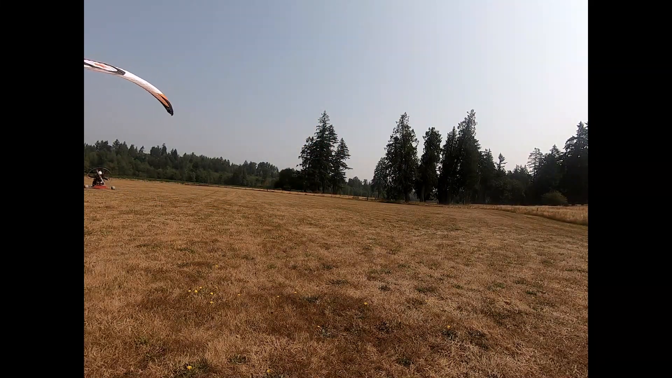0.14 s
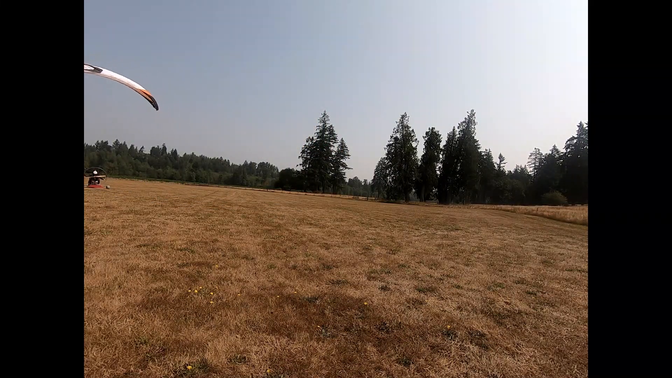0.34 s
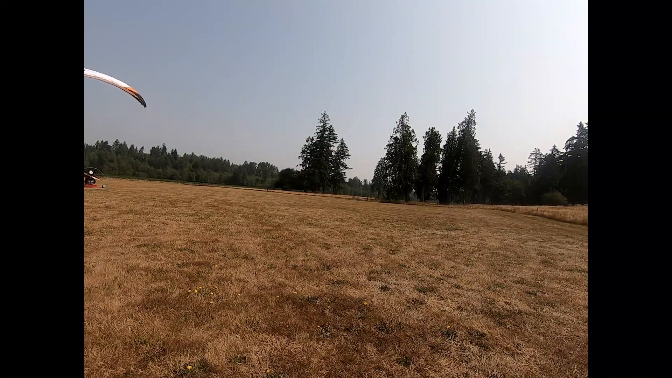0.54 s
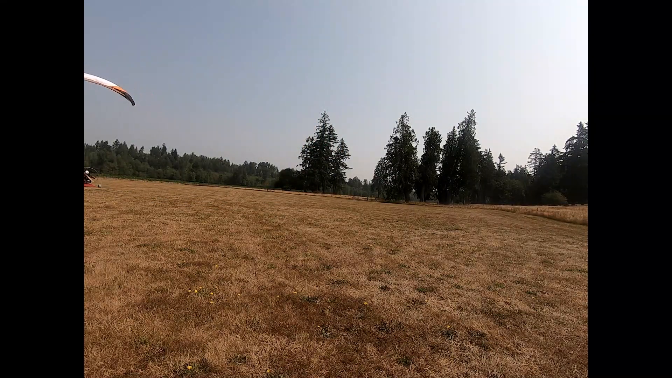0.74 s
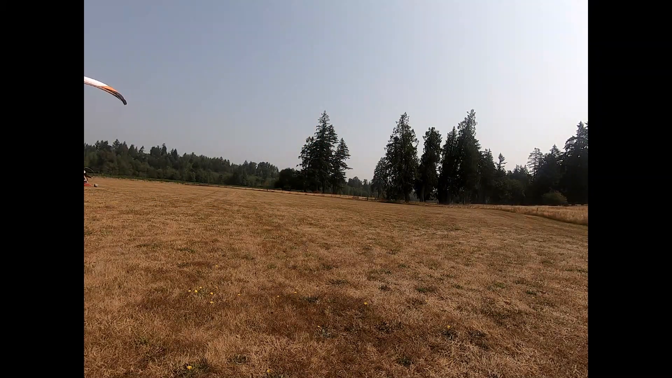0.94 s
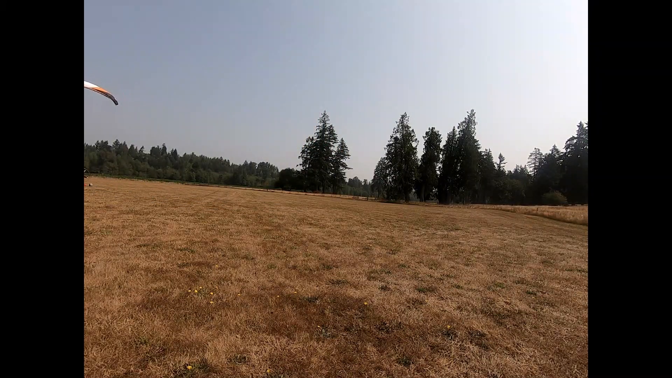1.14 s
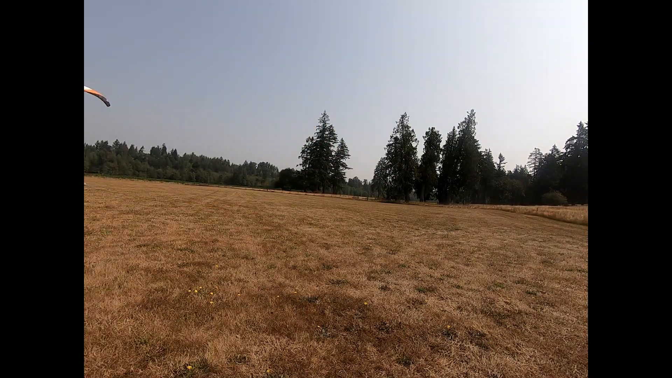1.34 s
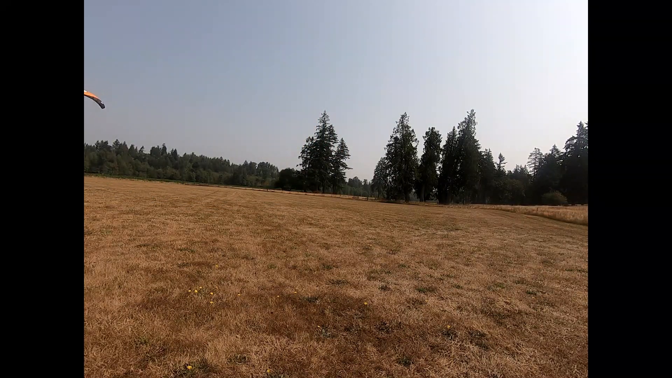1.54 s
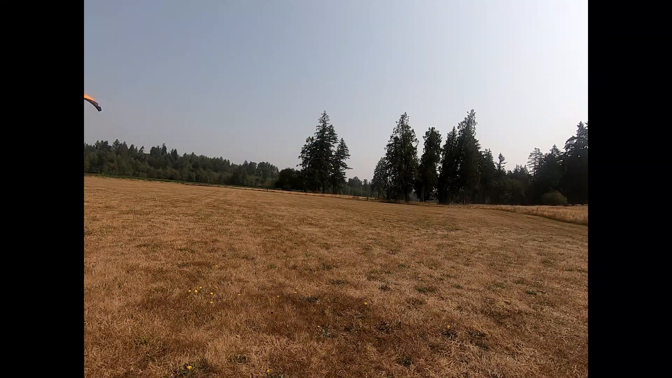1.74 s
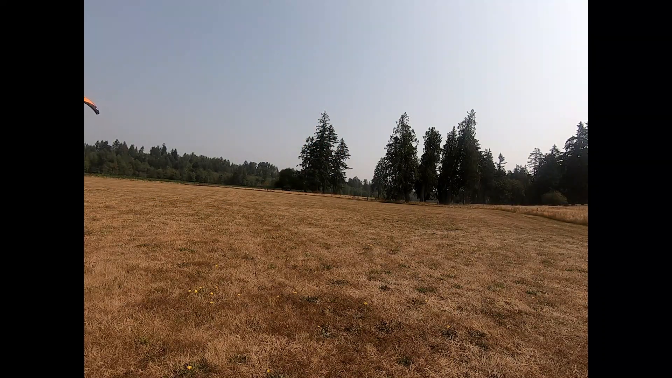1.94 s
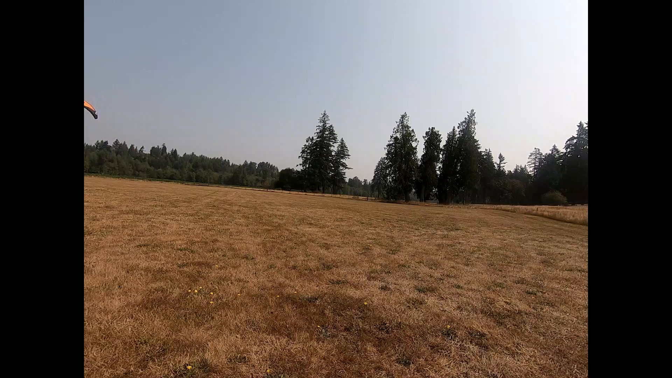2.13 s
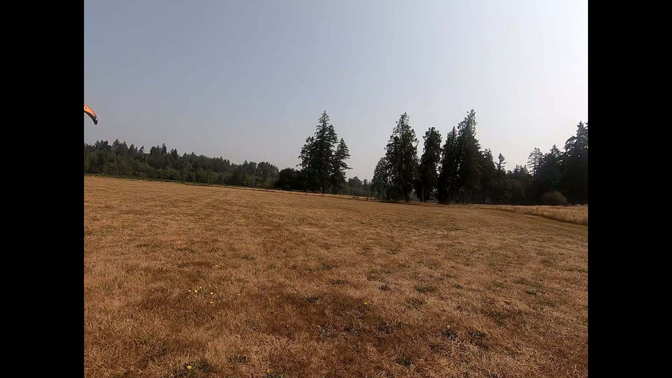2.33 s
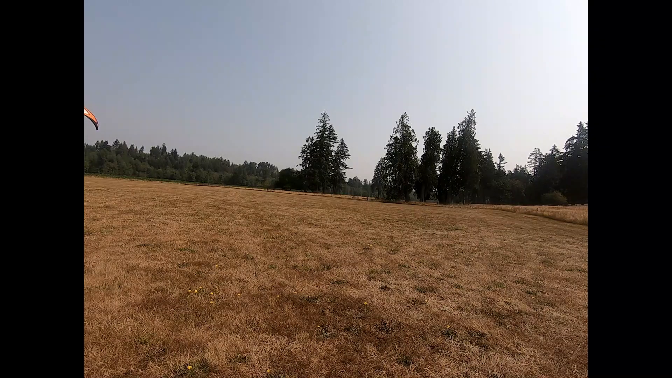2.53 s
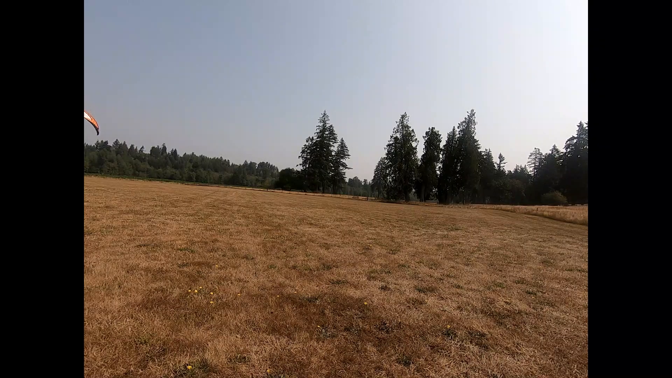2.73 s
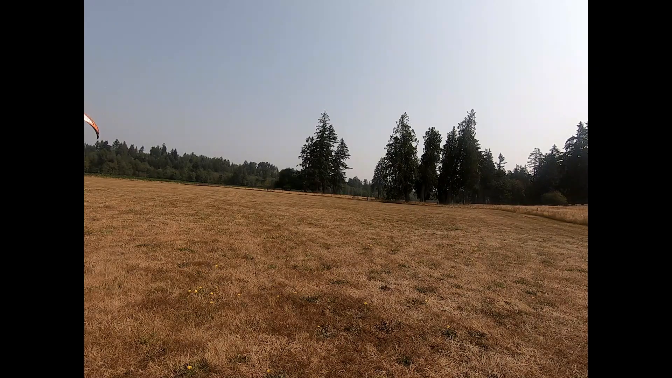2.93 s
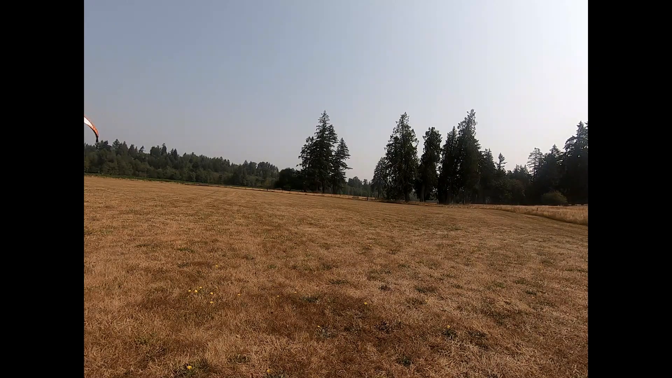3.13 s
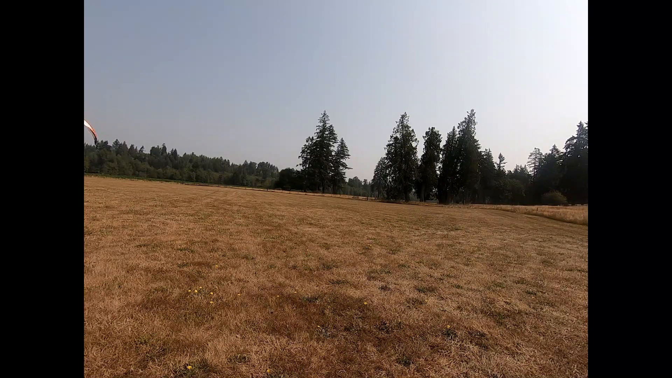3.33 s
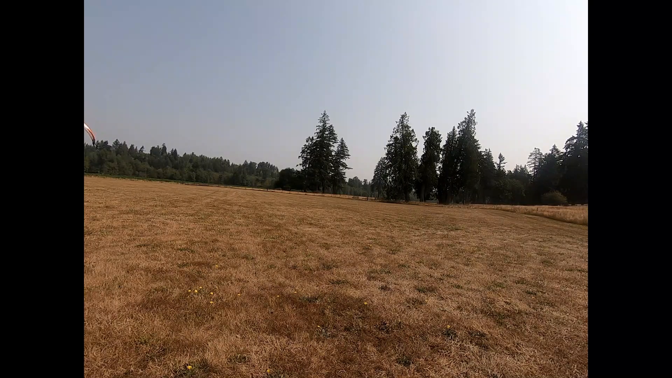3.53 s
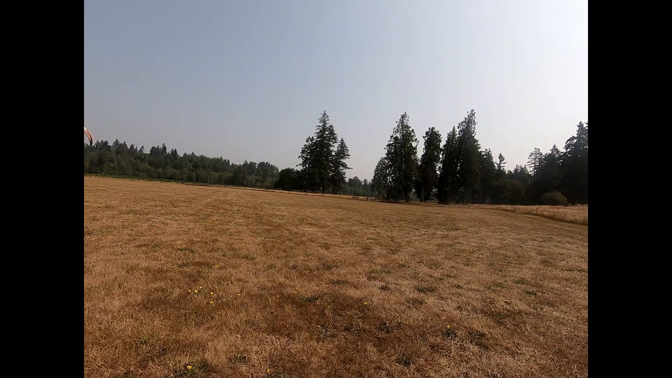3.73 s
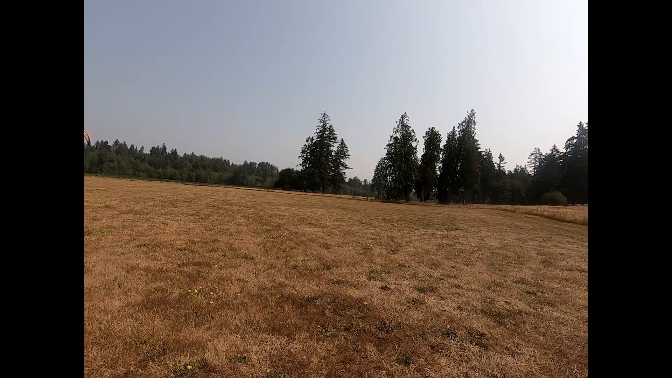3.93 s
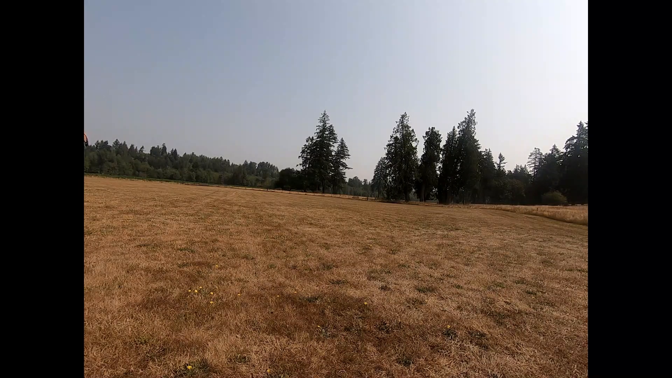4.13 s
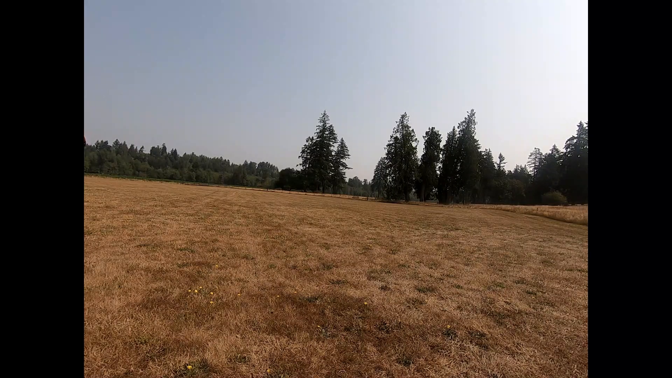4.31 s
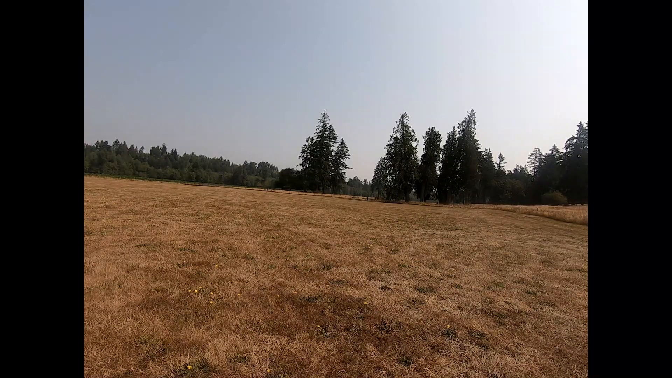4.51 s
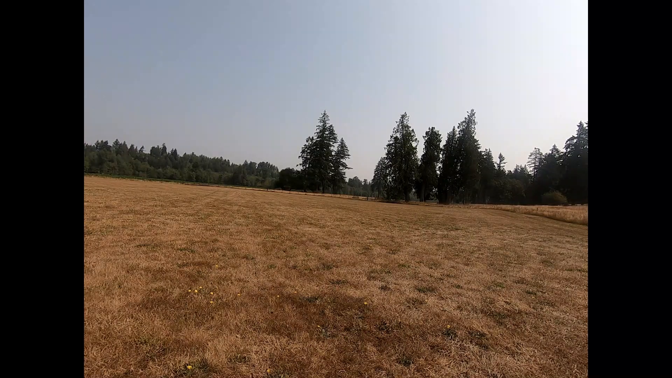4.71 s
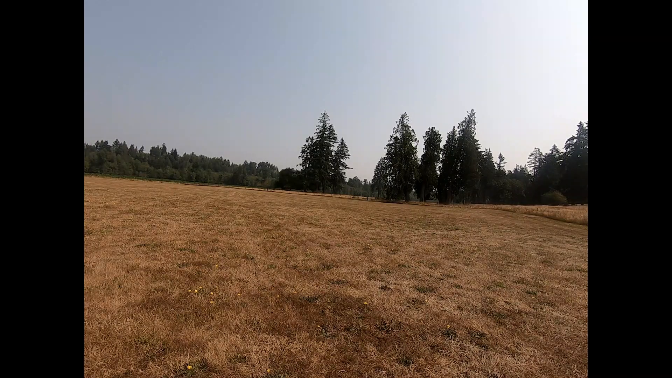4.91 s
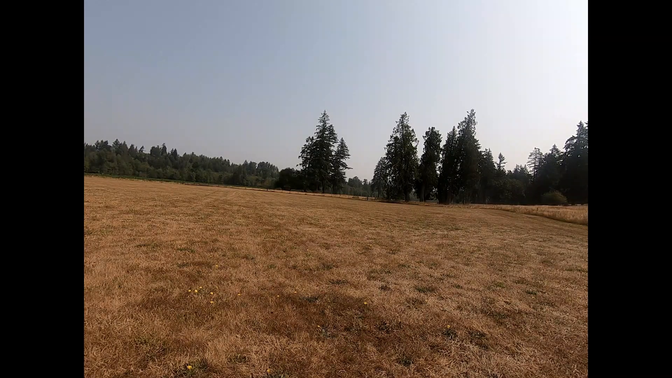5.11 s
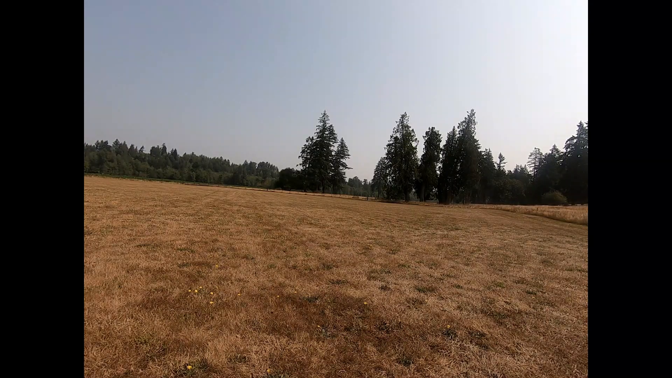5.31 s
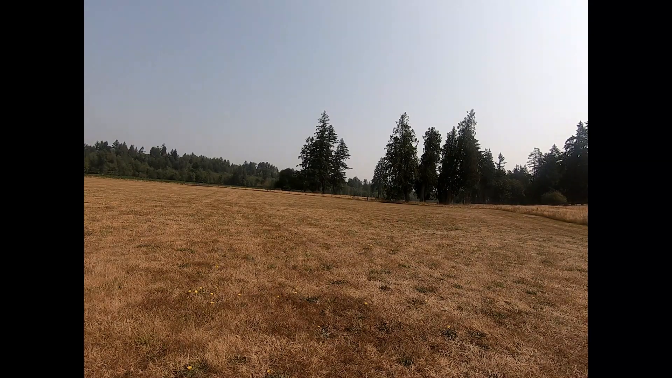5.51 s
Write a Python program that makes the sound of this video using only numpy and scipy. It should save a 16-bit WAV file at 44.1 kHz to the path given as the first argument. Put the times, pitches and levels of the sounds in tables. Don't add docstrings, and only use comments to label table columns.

```python
import sys
import numpy as np
from scipy import signal
from scipy.fft import rfft, irfft, next_fast_len
from scipy.io import wavfile
from scipy.ndimage import uniform_filter1d, map_coordinates

SR = 44100
rng = np.random.default_rng(int(sys.argv[2]) if len(sys.argv) > 2 else 0)


def field_ratio(decibels):
    return 10 ** (np.asarray(decibels, dtype=float) / 20)


def file_out(sig):
    cols = np.atleast_2d(sig).T
    lim = np.clip(cols, -1, 1)
    pcm = np.round(lim * 32767).astype(np.int16)
    wavfile.write(sys.argv[1], SR, pcm)


N = 245186

# (frequency [Hz], density [dB per Hz])
FIELD_SPECTRUM = [(20, -16.5), (60, 0.5), (300, -29), (700, -31), (1500, -38), (3000, -40), (6000, -68),
                  (9000, -77), (15500, -110)]
# (frequency [Hz], density [dB per Hz])
WAKE_SPECTRUM = [(20, -19), (45, -6.5), (80, 6), (150, -3), (250, -11), (400, -21.5), (700, -37.5),
                 (1200, -52), (3000, -97.5)]
# (frequency [Hz], density [dB per Hz])
HISS_SPECTRUM = [(250, -9.5), (500, -5), (1000, -1.5), (1550, -5), (2200, -7.5), (3600, -8.5),
                 (4130, -12.5), (5000, -13.5), (6000, -9.5), (7100, -9.5), (7700, -16.5), (10800, -29),
                 (14000, -35), (15400, -56.5)]
# (multiple of blade rate [-], level [dB])
COMB_SHAPE = [(5, -5), (7, 0), (8, -3), (10, -1), (12, 0), (16, -2), (20, -6), (26, -10), (32, -18)]
# (level [dB], gain per doubling of speed [dB], share of the rush's swing [-],
# change after the cut [dB], loss with throttle shut [dB])
BLADE_LINES = [
    (-18, 19, .15, -8.5, 2),
    (-26.5, 8.5, 0.5, -8, -2),
    (-48, 6.5, -0.34, 5, 5),
]
# (frequency [Hz], level of a line [dB])
PIPE_RESPONSE = [(55, -25), (90, -27.5), (140, -26.5), (200, -35), (250, -41.5), (350, -51.5), (420, -55.5)]
FIRING_SHUT_LOSS_DB = [9.5, 12, 14]
FIRING_CUT_DB = [2, -12, -5.5]
# (time [s], peak [dB])
POPS = [(2.081, -19), (2.125, -17), (2.203, -15), (2.287, -13), (2.39, -14), (2.476, -13), (2.552, -16),
        (2.615, -22), (2.68, -16), (2.746, -15), (2.815, -19), (2.865, -18), (4.35, -17), (5.44, -20)]
# (time [s], length [s], peak [dB])
RATTLE_BURSTS = [(2.498, .01, -52), (2.542, .03, -49), (2.6231, .01, -36), (2.7404, .075, -39),
                 (2.833, .01, -54), (2.8553, .05, -38), (2.989, .01, -38), (3.003, .04, -50.5),
                 (3.0856, .03, -35), (3.112, .025, -34.5), (3.1423, .08, -35.5), (3.2757, .045, -35),
                 (3.3561, .075, -39), (3.445, .03, -48), (5.24, .01, -44), (5.344, .01, -50)]
# (time [s], blade passes [Hz], firings [Hz])
SPEEDS = [
    [(0, 72.4, 100.1), (.3, 84.23, 119), (.42, 87.33, 121.2), (1.13, 88.8, 123.2), (1.37, 82.3, 110.5),
     (1.6, 78.3, 108.5), (1.9, 87.97, 119.7), (2.2, 64.27, 86.47), (2.38, 54, 72.6), (2.66, 43.87, 61.1),
     (2.95, 45, 60.96), (3.2, 51.84, 75.82), (3.39, 65.07, 90.56), (3.73, 77.7, 107.8), (4.04, 81.1, 110.2),
     (4.25, 79.05, 105.9), (5.03, 59.77, 83.1), (5.49, 52, 71.34)],
    [(5.5, 94, 110)],
]
# (time [s], throttle [0-1])
THROTTLE = [(0, 1), (.3, 1), (1.1, 0.9), (1.17, 0.2), (1.5, 0.4), (1.9, 0.7), (2.1, 0.09), (2.7, 0),
            (3.1, 0.86), (3.4, .9), (3.7, 0.86), (4.3, 0.47), (4.6, 0.43), (5.4, 0.3), (5.49, 0.3),
            (5.5, 0.8)]
# (time [s], rush of air heard [dB], facing [0 turned away - 1 blowing this way])
PATH = [(0, -39.5, 0.59), (.15, -38.5, 0.57), (.3, -44, 0.96), (.9, -49.5, 1), (1.05, -47.5, 0.52),
        (1.35, -49.5, 0.33), (1.65, -50, 0.29), (1.95, -47.5, 0.14), (2.25, -50.5, 0.036),
        (2.65, -55.5, 0.06), (3.05, -56.5, .2), (3.25, -55, 0.17), (3.85, -53, 0.1), (4.05, -54.5, 0.34),
        (4.65, -56, 0.28), (4.85, -54.5, 0.0088), (5.49, -58.5, .01), (5.5, -48.5, 0.13)]
# (frequency [Hz], left minus right [dB])
PORT_DIFFERENCE = [(90, -.8), (200, -5), (480, -14), (620, -8), (900, 1), (1500, 8), (2200, 10), (2700, 15),
                   (3400, 9), (4000, 10), (4400, 3), (5900, -11), (7700, 1), (10500, -3)]
# (frequency [Hz], left leads by [rad])
PORT_LEAD = [(30, -.4), (250, -.5), (400, -.2), (600, 2.1), (2300, 1.7), (3100, .2), (3900, 1.0),
             (4300, .2), (5200, .5), (6000, 2.0), (7000, 3.0), (12000, 2.8)]
# (left [dB], right [dB])
CUT_STEP_DB = (-31, -22)

CUT_S = 5.4962
FULL_HZ, NEAR_DB = 87, -42


def in_time(table):
    s, *columns = np.transpose(table)
    return [np.interp(np.arange(N) / SR, s, column) for column in columns]


def at_hz(points, hz):
    points_hz, values = np.transpose(points)
    return np.interp(np.log(hz + 1), np.log(points_hz), values)


def drift(rate_hz):
    knots, coarse = rng.standard_normal(400), np.arange(0, N + 32, 32)
    position = 3 + coarse / SR * np.clip(rate_hz, .1, 60)
    return np.interp(np.arange(N), coarse, map_coordinates(knots, [position], order=3))


def coloured(spectrum, channels=1):
    hz = np.arange(N // 2 + 1) * SR / N
    white = rng.standard_normal((channels, N))
    noise = irfft(rfft(white) * field_ratio(at_hz(spectrum, hz)), N)
    return noise / np.sqrt(np.mean(noise ** 2) + 1e-20)


def lowpass(x, order, hz):
    return signal.sosfilt(signal.butter(order, hz, fs=SR, output="sos"), x)


def smooth(x, tau_s, start=0):
    keep = np.exp(-1 / (tau_s * SR))
    return signal.lfilter([1 - keep], [1, -keep], x, zi=[start * keep])[0]


def ring(s, size, hz, t60_s):
    start = int(s * SR)
    t = np.arange(min(int(.08 * SR), N - start)) / SR
    return slice(start, start + len(t)), size * np.sin(2 * np.pi * hz * t) * field_ratio(-60 * t / t60_s)


def after_cut():
    return np.arange(N) >= CUT_S * SR


def speeds():
    inertia_s = .09
    before = uniform_filter1d(in_time(SPEEDS[0]), size=int(inertia_s * SR), mode="nearest")
    return np.where(after_cut(), in_time(SPEEDS[1]), before)


def shut():
    return 1 - np.clip(in_time(THROTTLE)[0], 0, 1)


def surge():
    octaves = np.log2(in_time(SPEEDS[0])[0])
    rise = np.clip(np.gradient(octaves) * SR, 0, None)
    return smooth(rise, tau_s=.53, start=rise[0])


def follows(db, per_octave_db, share, cut_db=0, shut_db=0):
    db = db + cut_db * after_cut() - shut_db * shut()
    db = db + per_octave_db * np.log2(speeds()[0] / FULL_HZ)
    return db + share * (in_time(PATH)[0] - NEAR_DB)


def ports(x, share=1):
    pad = 2048
    x = np.pad(np.atleast_2d(x), ((0, 0), (pad, pad)), "reflect", reflect_type="odd")
    size = next_fast_len(x.shape[1])
    hz = np.arange(size // 2 + 1) * SR / size
    half = field_ratio(share * at_hz(PORT_DIFFERENCE, hz) / 2) * np.exp(.5j * at_hz(PORT_LEAD, hz))
    return irfft(rfft(x, size) * np.array([half, 1 / half]), size)[:, pad:N + pad]


def field():
    left, right, both = coloured(FIELD_SPECTRUM, channels=3) * field_ratio(-39.5 + 1.9 * drift(0.37))
    return np.array([left, right]) + 1.2 * lowpass(both, 2, 200)


def knocks():
    knock_hz, pitch_spread = 6550, 0.06
    loss_db, spread_db = 2.5, 5.5
    period_s = 1 / speeds()[1]
    rows = []
    for s, length_s, db in RATTLE_BURSTS:
        gap_s = period_s[int(s * SR)]
        for k, (size, pitch) in enumerate(rng.standard_normal((8, 2))):
            if k * gap_s < length_s:
                peak_db = db - loss_db * k + spread_db * size * (k > 0)
                rows.append((s + k * gap_s, peak_db, knock_hz * (1 + pitch_spread * pitch)))
    return rows


def rattle():
    out = np.zeros(N)
    for s, db, hz in knocks():
        for k, (late, size, detune) in enumerate(rng.random((6, 3))):
            pitch_hz = hz * (.85 + 0.34 * detune) if k else hz
            tick_amp = (0.21 + .5 * size) * field_ratio(db - 3.1 * k)
            where, tick = ring(s + 0.0036 * k * late, tick_amp, pitch_hz, t60_s=.006)
            out[where] += tick
    out += 1.9 * smooth(np.abs(out), tau_s=.022) * rng.standard_normal(N)
    return signal.sosfilt(signal.butter(2, [4300, 7400], "band", fs=SR, output="sos"), out)


def engine(turn):
    even, uneven = .12, .55
    hz = speeds()[1]
    cycles = np.cumsum(hz) / SR
    phase = 2 * np.pi * cycles
    chance = map_coordinates(rng.standard_normal(800), [cycles + 2], order=3)
    strength = 1 + (even + uneven * shut() ** 2) * chance
    lines_db = []
    for k, (loss_db, cut_db) in enumerate(zip(FIRING_SHUT_LOSS_DB, FIRING_CUT_DB), 1):
        lines_db.append(at_hz(PIPE_RESPONSE, k * hz) - loss_db * shut() + cut_db * after_cut())
    thud = sum(field_ratio(db) * np.cos(k * phase) for k, db in enumerate(lines_db, 1))
    thud += field_ratio(lines_db[2] - 16) * np.cos(4 * phase)
    thud += field_ratio(lines_db[0] - 19) * np.cos(phase + turn)
    out = -np.sqrt(2) * strength * thud
    for s, db in POPS:
        where, pulse = ring(s - .0032, -field_ratio(db), hz=90, t60_s=.055)
        out[where] += pulse * np.minimum(np.arange(len(pulse)) / (.0025 * SR), 1)
    return out


def blade_air(turn):
    hiss_db, facing = in_time(PATH)
    rasp_db = -10.5 + 14 * facing
    sizzle_db = -12.5 + 16.5 * facing
    hiss = coloured(HISS_SPECTRUM, channels=3)
    below_1500, below_2600, below_4000 = [
        signal.sosfiltfilt(signal.butter(3, hz, fs=SR, output="sos"), hiss) for hz in (1500, 2600, 4000)]

    surging = surge()
    roar = (below_2600 - below_1500) * field_ratio(7.5 * surging - 1)
    rasp = (below_4000 - below_2600) * field_ratio(-5 * surging)
    bands = below_1500 * field_ratio(.7 * drift(8))
    bands += (rasp + roar) * field_ratio(rasp_db + 1.5 + .7 * drift(9))
    bands += (hiss - below_4000) * field_ratio(sizzle_db + 4 + .8 * drift(11))

    wobble = turn + .3 * drift(40)
    chop_db = 3.9 * np.cos(wobble - 1.0) + 2.1 * np.cos(2 * wobble - 1.6) + .5 * drift(55)
    scatter = field_ratio(follows(-7, 0, -.75))
    total = np.hypot(1, scatter)
    bands *= field_ratio(chop_db / total * np.array([[1], [.4], [.4]]))
    bands *= np.array([np.ones(N), scatter, scatter]) / total
    bands *= field_ratio(hiss_db + 1)
    wake_db = follows(-35, 0, 0.083) + 1.6 * drift(10)
    bands[0] += field_ratio(wake_db) * coloured(WAKE_SPECTRUM)[0]
    return bands


def propeller(turn):
    first_db, second_db, third_db = [follows(*line) for line in BLADE_LINES]
    hum = field_ratio(first_db) * np.cos(turn)
    hum += field_ratio(second_db) * np.cos(2 * turn - .6)
    hum += field_ratio(third_db) * np.cos(3 * turn - 1.5)
    hum += field_ratio(second_db - 22 + 2 * drift(4.9)) * np.cos(4 * turn - 2.5)

    rush_db, facing = in_time(PATH)
    comb_db = follows(-51.3, 20, .7, cut_db=-4)
    comb_db += 1.6 * np.minimum(rush_db + 49, 0)
    fall_db = 1.2 * (1 - np.clip(facing, 0, 1))
    for k in range(5, 33):
        level_db = comb_db - fall_db * max(k - 12, .6 * (12 - k))
        level_db += np.interp(k, *np.transpose(COMB_SHAPE)) + 3.2 * drift(6)
        hum += field_ratio(level_db) * np.cos(k * turn - .05 * k * k + .028 * k * drift(14))
    return np.sqrt(2) * hum


def scene():
    turn = 2 * np.pi * np.cumsum(speeds()[0]) / SR
    direct, *scattered = blade_air(turn)
    machine = rattle() + engine(turn) + direct + propeller(turn)
    return field() + ports(scattered, share=.3) + ports(machine)


def roll_off(x):
    return signal.sosfilt(signal.butter(12, 15050, fs=SR, output="sos"), x)


def record(dry):
    fade_s = .005
    after_s = np.arange(N) / SR - CUT_S
    step = (after_s >= 0) * -np.exp(-np.abs(after_s) / fade_s)
    mix = dry + field_ratio(np.array(CUT_STEP_DB))[:, None] * step
    return roll_off(mix)


dry = scene()
out = record(dry)
file_out(out)
```